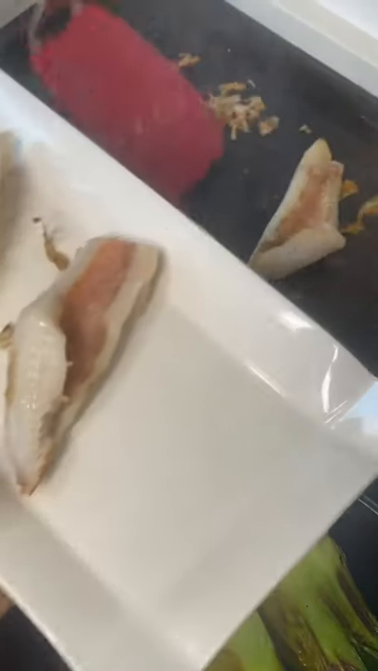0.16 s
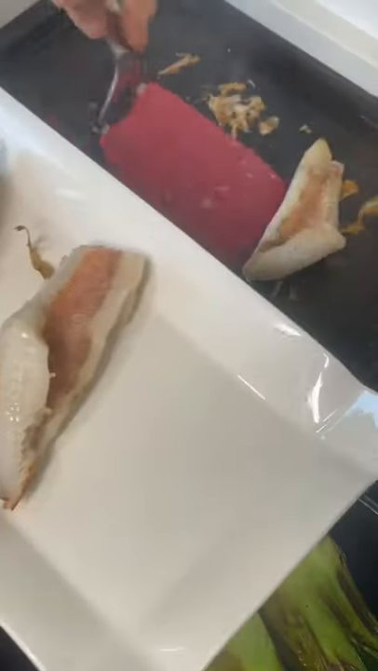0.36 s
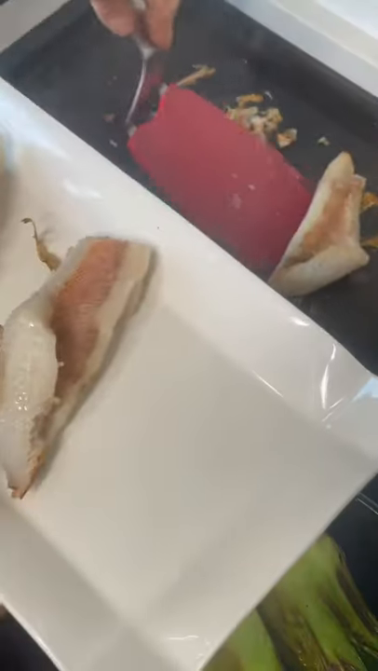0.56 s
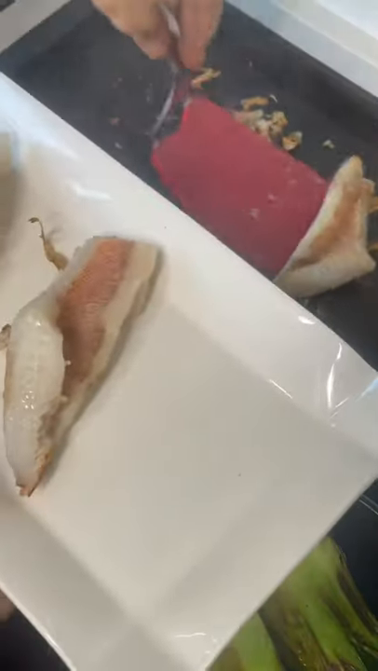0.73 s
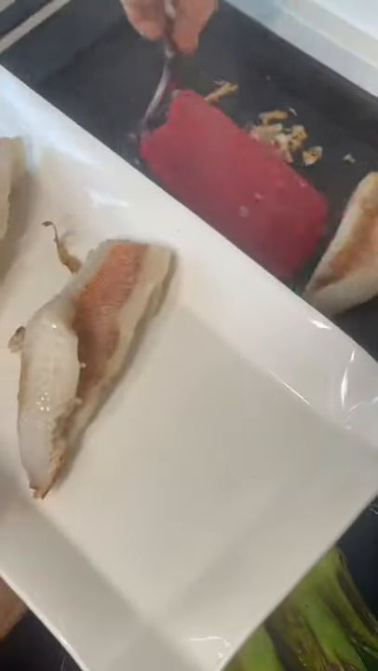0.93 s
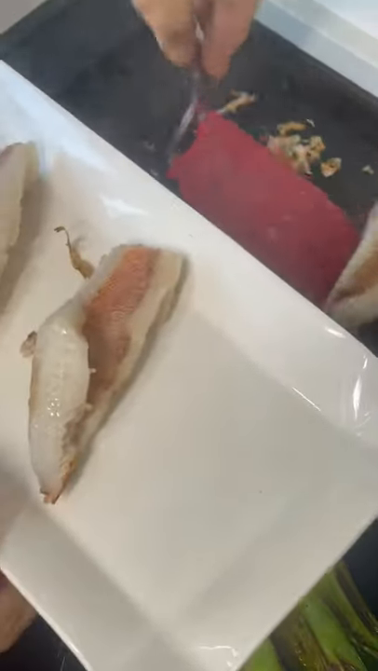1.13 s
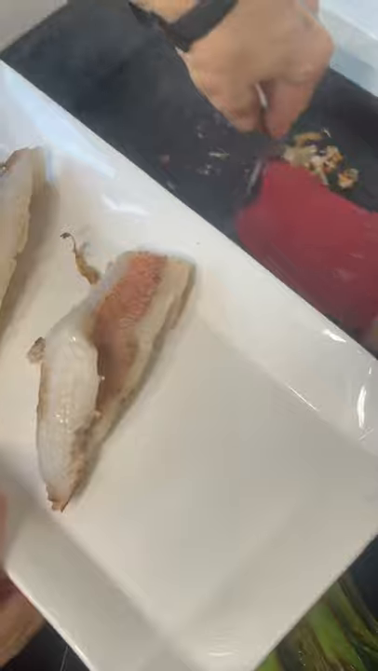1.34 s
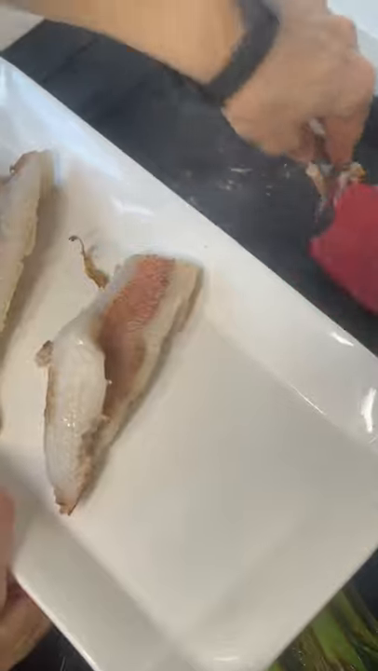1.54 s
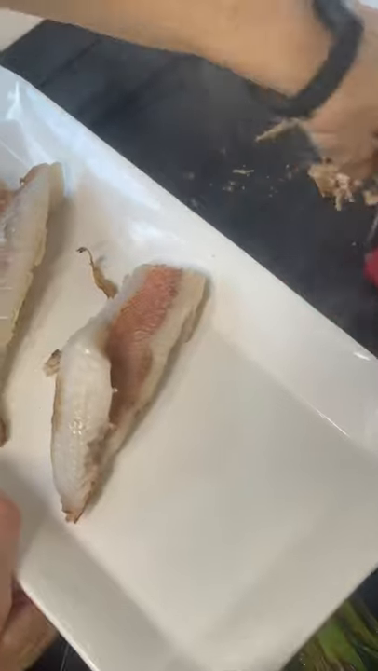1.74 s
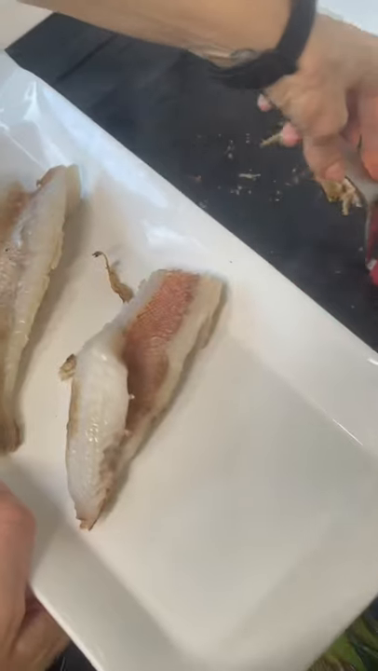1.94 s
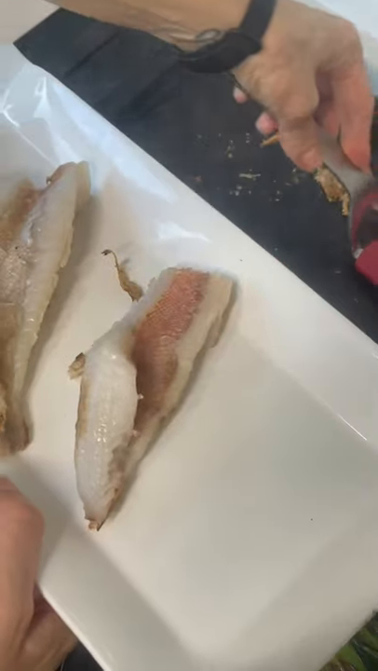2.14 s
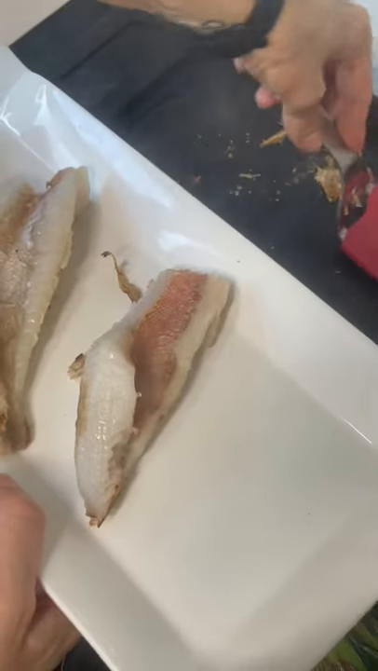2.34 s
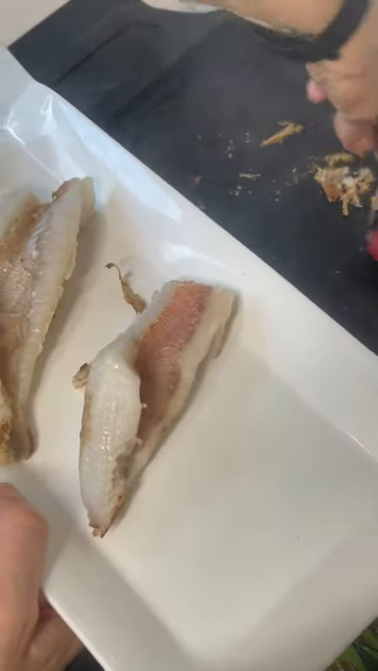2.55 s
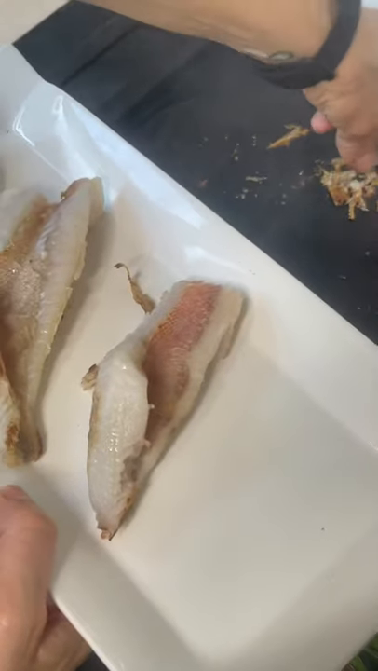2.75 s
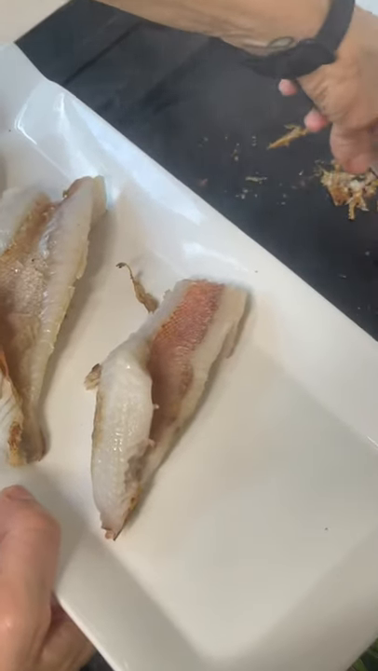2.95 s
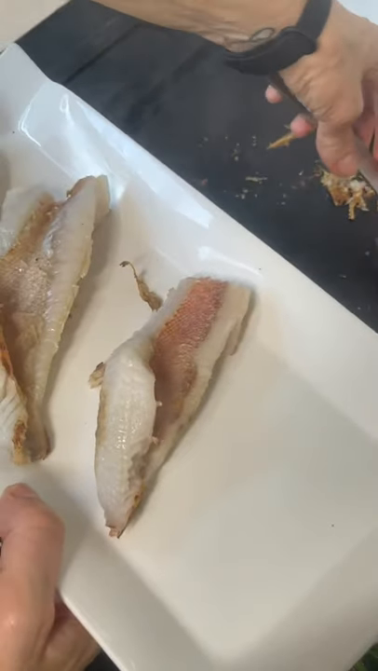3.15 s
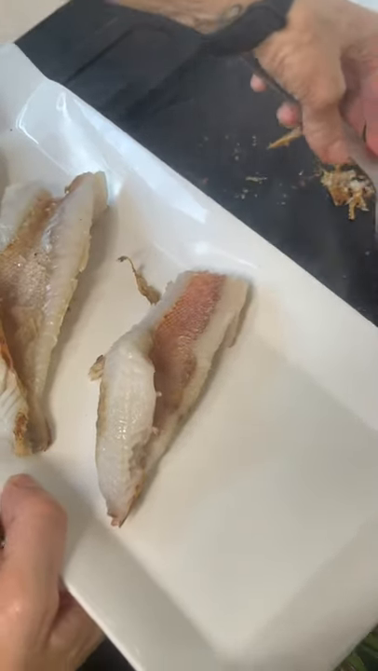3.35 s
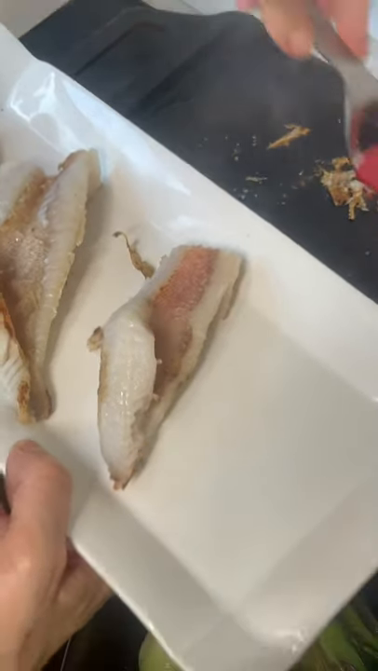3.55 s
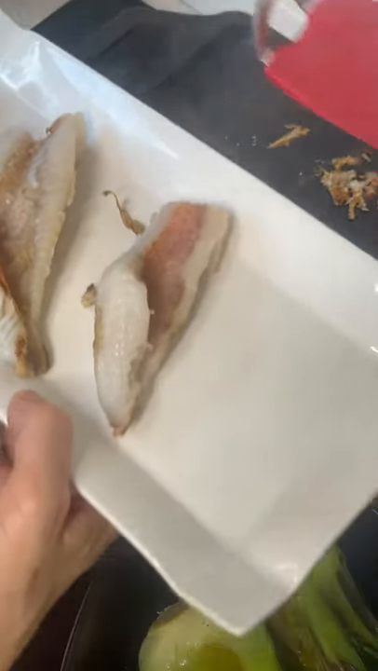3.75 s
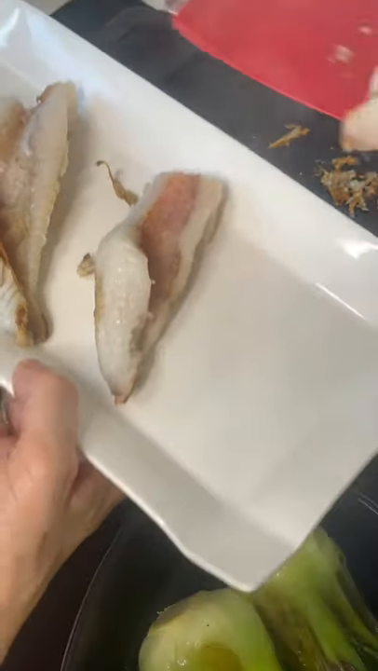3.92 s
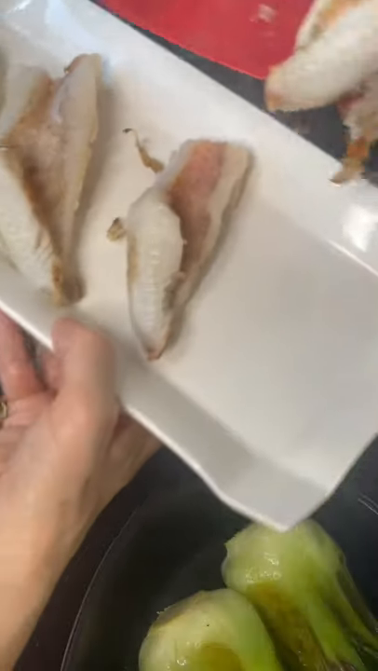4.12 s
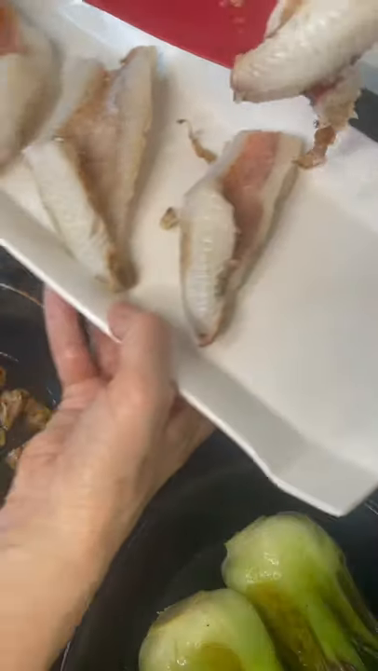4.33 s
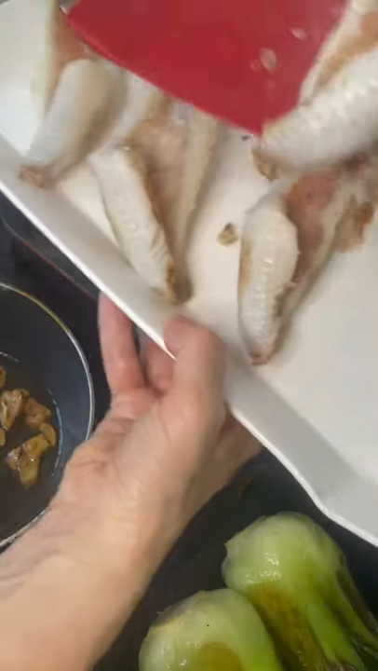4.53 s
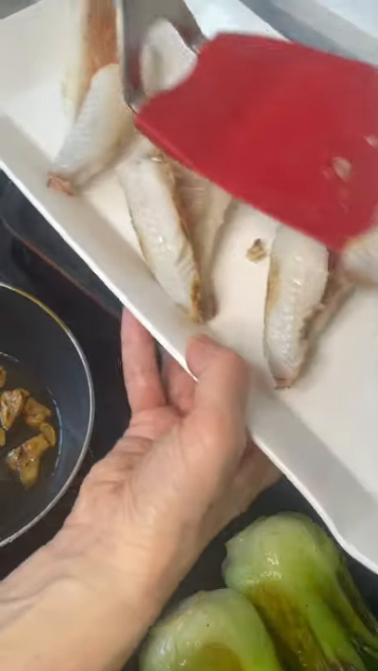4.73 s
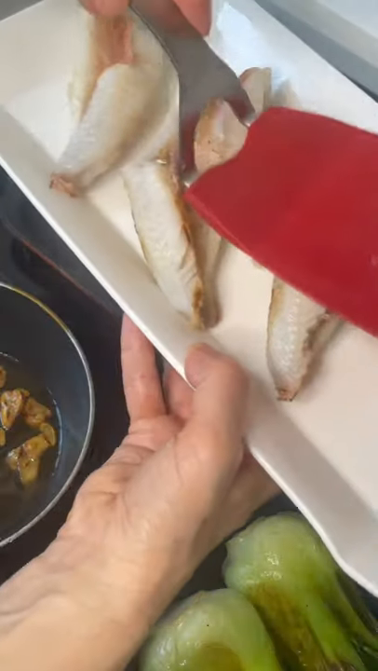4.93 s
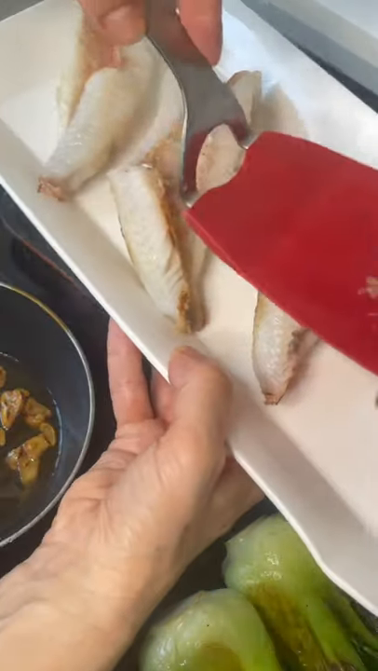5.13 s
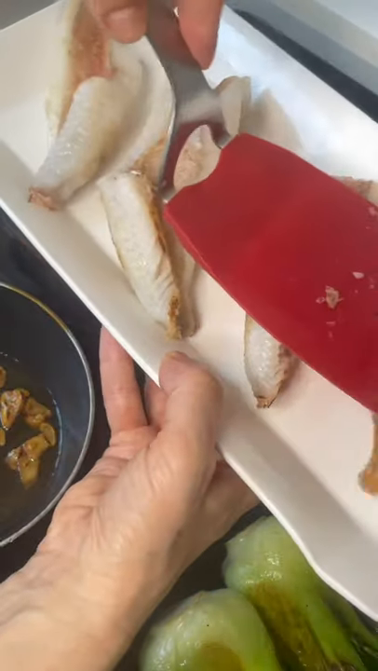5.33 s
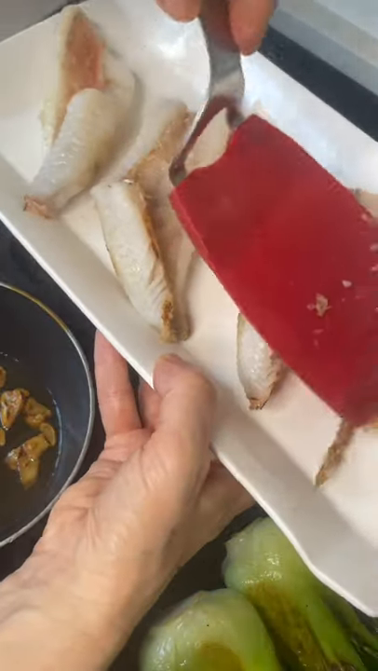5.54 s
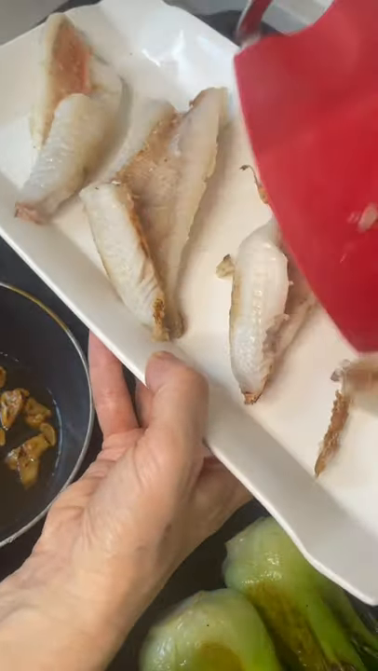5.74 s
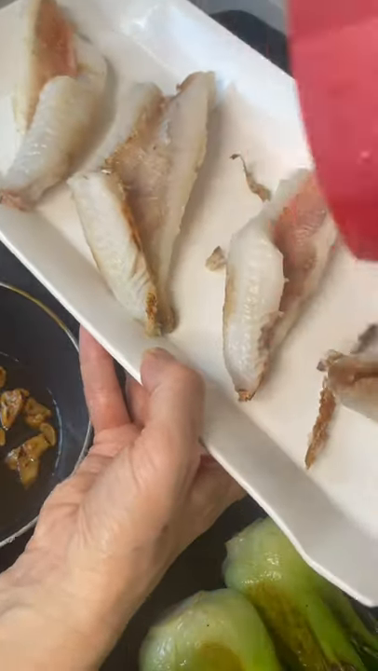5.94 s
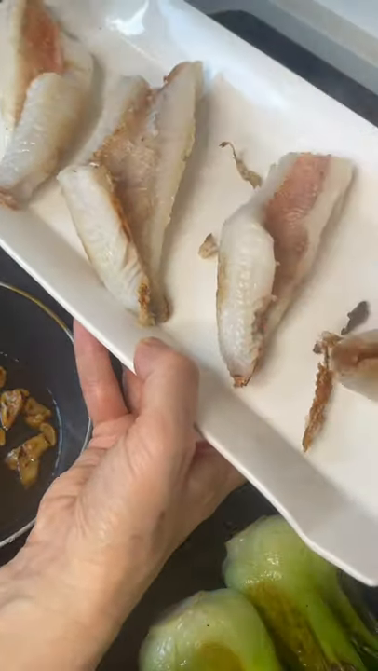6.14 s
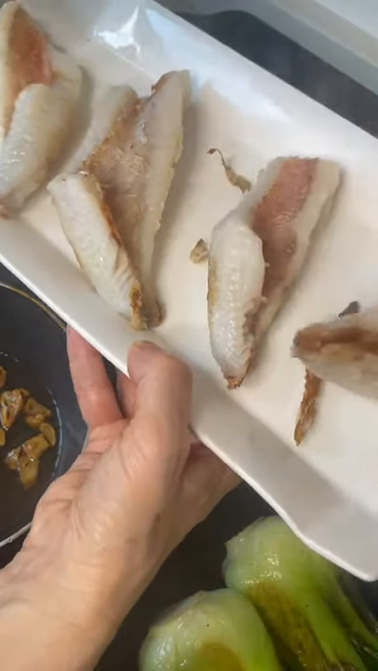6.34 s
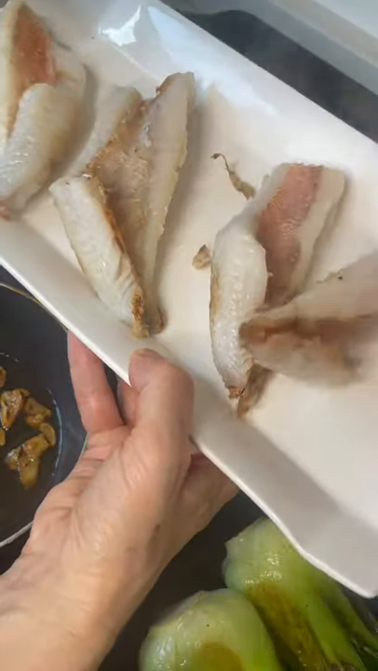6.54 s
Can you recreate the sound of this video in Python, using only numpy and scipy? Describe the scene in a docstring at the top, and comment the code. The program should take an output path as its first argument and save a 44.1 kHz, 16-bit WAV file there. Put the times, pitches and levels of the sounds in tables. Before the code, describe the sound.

Fish fillets sizzle fiercely on a hot steel griddle as a soft spatula knocks and pushes, then the frying thins to sharp crackling oil spits.

```python
"""In a kitchen, fish fries in oil on a steel griddle: dense noise bursts sizzle, swell as a soft spatula
pushes the fillets, then thin to single spits of oil, each a noisy crack with ringing resonances.
Decaying modes sound the spatula's knocks on the griddle and its taps on a plate; resonant noise is its rub.
Dull low thuds fall in pitch, and an extractor blows filtered noise under wavering hums.
The left and right channels differ in likeness, level and phase, the phase drifting far apart in the treble."""
import sys
import numpy as np
from scipy import signal
from scipy.fft import rfft, irfft, next_fast_len
from scipy.io import wavfile
from scipy.ndimage import uniform_filter1d, map_coordinates

SR = 44100
rng = np.random.default_rng(int(sys.argv[2]) if len(sys.argv) > 2 else 0)


def dump(signal):
    """Clip the signal to [-1, 1] and save it as 16-bit WAV at the path in sys.argv[1]."""
    limited = np.clip(np.atleast_2d(signal).T, -1, 1)
    pcm = np.round(limited * 32767).astype(np.int16)
    wavfile.write(sys.argv[1], SR, pcm)


N = 290170  # samples

# Steady frying. Each row: time in seconds, fine fizz level in dB, then the levels of the middle and of the
# large bubbles in dB relative to the fizz.
STEADY_FRYING = [(0.0, -48.5, -8, -25), (0.2, -53, -6, -20), (0.6, -41, -9, -22), (1.1, -38.5, -9, -14.5),
                 (1.55, -31.5, -12, -7), (2.15, -43.5, -8, -15), (2.5, -42, -16, -11.5),
                 (2.95, -40, -3.5, -12.5), (3.1, -46.5, -5.5, -13.5), (3.44, -47, -9.5, -17),
                 (3.85, -55, -8.5, -23), (4.11, -49, -15, -32), (4.3, -55, -5, -24),
                 (4.61, -59.5, -13, -44), (4.98, -56, -10, -18), (5.25, -55, -13, -38),
                 (5.4, -55.5, -9.5, -34), (6.2, -57.5, -13, -32)]


def frying():
    """Steam bursting through oil: noise modulated by dense impulses, in three bubble-size bands."""
    # Spectra of fine fizz, middle and large bubbles. Each row: frequency in Hz, relative level in dB per Hz.
    fizz_spectrum = [(4000, -41), (6000, -11.5), (8500, -3), (10500, 6), (11500, 1), (12600, -12),
                     (13900, -33), (15100, -17.5), (16300, -73)]
    middle_spectrum = [(2000, -25), (3200, -2.5), (4500, -1.5), (6000, 1), (8000, 2), (11000, -14)]
    large_spectrum = [(500, -3), (900, -8.5), (1500, 1), (2500, 0.5), (4000, -1.5), (7000, -10)]
    # Griddle modes the frying keeps alive. Each row: frequency in Hz, bandwidth in Hz, level in dB re large bubbles.
    driven_modes = [(2324, 8.7, -11), (2746, 93, -7)]
    crackle = 1.5 + 0.5 * bursts(per_s=700, spread_db=2.5, t60=0.005)
    fizz = coloured(patchy(crackle * rng.standard_normal(N), 1.64), fizz_spectrum)
    middle = coloured(patchy(crackle * rng.standard_normal(N), 2.15), middle_spectrum)
    middle = middle + 0.3 * blips(500, 4605, turns=13)
    large = coloured(patchy(crackle * rng.standard_normal(N), 2.45), large_spectrum)
    large = large + 0.28 * blips(400, 2610, turns=12)
    steel = sum(amp(db) * narrow(hz, width) for hz, width, db in driven_modes)
    layers = np.sqrt(frying_power()) * [fizz, middle, large + steel]
    return amp(0.69 * wobble(24.86)) * np.sum(layers, axis=0)


def frying_power():
    """Incoherent sources add in power: steady frying plus a flare for each push onto hot steel."""
    # A push wets hot steel. Each row: peak time in seconds, fizz level in dB, rise in seconds (at least 0.005
    # is used), hold in seconds, initial fade in dB per second, middle and large bubble levels in dB re fizz.
    pushes = [(0.28, -37, 0.12, .01, 130, -15, -19.5), (0.346, -28.5, 0.026, 0.07, 77, -10, -22),
              (0.46, -38.5, 0.048, 0.012, 106, -10, -4.5), (0.672, -32.5, .02, 0.047, 29, -8, -12),
              (0.849, -26, 0.013, 0.0034, 530, -2.5, -11), (1.0, -26.5, 0.068, .01, 160, -10.5, -12),
              (1.13, -34.5, 0.06, 0.033, 26, -12, -22.5), (1.279, -24.5, 0.04, 0.036, 133, -7.5, -16),
              (1.539, -25, 0.3, 0.0049, 60, -2.5, -19.5), (1.799, -31, 0.27, 0.011, 62, -4, -17.5),
              (2.239, -32, 0.065, .005, 160, -7, -13.5), (2.364, -35.5, 0.067, 0.036, 31, -1.5, -16.5),
              (2.68, -34.5, 0.11, 0.016, 88, -1.5, -16), (2.83, -41, 0.028, 0.0041, 80, 3, -27)]
    rise_db, spent_db = 18.5, 12.5  # climb over one rise time; drop beyond which the slope is 11 times steeper
    fizz_db, middle_db, large_db = curves(STEADY_FRYING)
    power = amp(2 * np.array([fizz_db, fizz_db + middle_db, fizz_db + large_db]))
    t = np.arange(N) / SR
    for s, db, rise, hold, fade, middle_db, large_db in pushes:
        before = rise_db * np.clip((s - t) / max(rise, 0.005), 0, None)
        down = before + fade * np.clip(t - s - hold, 0, None)
        down = down + 10 * np.clip(down - spent_db, 0, None)
        power = power + amp(2 * (db + np.array([[0], [middle_db], [large_db]]) - down))
    return power


def spits():
    """Each drop of water explodes: an impulsive noise crack excites bubble and drop resonances."""
    # Each row: start in seconds, crack level in dB, body level in dB (offset per part below), drop size 0-1.
    drops = [(0.844, -14.5, -35, .3), (0.952, -23, -41, 0.34), (0.9843, -21, -32, 0.44),
             (1.2277, -27, -39.5, .6), (1.2712, -17, -35, 0.6), (1.3967, -24, -40, 0.7),
             (1.7105, -20.5, -35.5, 0.6), (1.9424, -29, -43, 0.56), (2.0734, -29, -50, 0.17),
             (2.2035, -27, -40.5, 0.8), (2.2303, -30, -42, .1), (2.3802, -26, -52, .01),
             (2.4212, -23, -38.5, 0.7), (2.6802, -20.5, -45, 0.3), (2.757, -26, -51, 0.2),
             (2.7755, -20, -33.5, 0.18), (2.8074, -35, -56, 0.9), (2.8256, -20, -45, 0.13),
             (2.893, -38, -44, 0.7), (2.9985, -20, -37, 0.19), (3.0516, -33, -53, .1),
             (3.067, -27.5, -56, 0.12), (3.1265, -27, -49, 0.27), (3.1929, -30.5, -46, 0.5),
             (3.2625, -21.5, -54, 0), (3.2783, -23, -41, 0.27), (3.3055, -18, -51, 0.14),
             (3.3225, -24, -52, 0), (3.3468, -23.5, -44, 0.17), (3.379, -24.5, -50, 0.07),
             (3.385, -17, -33, 0.28), (3.4179, -34, -58, 0), (3.4723, -30.5, -50, 0.18),
             (3.5131, -25, -60, 0.16), (3.5403, -25.5, -49, 0.22), (3.572, -31, -56, 0.3),
             (3.6174, -31, -59, 0.14), (3.6386, -20.5, -46, 0.43), (3.667, -31, -52, .1),
             (3.715, -34, -51, 0), (3.742, -27, -42.5, 0.15), (3.819, -26, -68, 0.13),
             (3.8911, -21, -51, 0.13), (3.924, -33, -57, 0.1), (4.011, -32, -49.5, .3),
             (4.0635, -23.5, -49, 0.24), (4.0868, -22, -61, 0.17), (4.1436, -30, -72, 0.22),
             (4.2157, -26.5, -51, 0.08), (4.231, -24, -67, 0.38), (4.303, -32.5, -49.5, 0.36),
             (4.3708, -25.5, -45.5, 0.04), (4.44, -30, -52.5, 0.42), (4.5647, -46, -50, 0.12),
             (4.6203, -31, -51, 0.13), (4.7452, -36, -70, 0.1), (4.7637, -41, -62, .1),
             (4.7757, -28.5, -52, 0.22), (4.8502, -21.5, -38.5, 0.82), (4.88, -20, -32, 0.38),
             (4.915, -17.5, -30, 0.4), (5.0315, -31, -65, 0.3), (5.0796, -32, -51, 0.05),
             (5.0928, -36, -59, 0.15), (5.1123, -30, -68, 0.3), (5.163, -34.5, -71, 0.5),
             (5.2451, -13.5, -32, 0.5), (5.367, -32, -57, 0.2), (5.4642, -33, -50, .2),
             (5.6264, -25, -53, 0), (5.6508, -39, -50, 0.03), (5.6986, -15, -41, 0.34),
             (5.768, -29.5, -44, 0.35), (5.963, -37.5, -67, 0.15), (6.0754, -35, -49, 0.15),
             (6.1356, -33.5, -61, 0.1), (6.306, -44.5, -52, 0.16), (6.4584, -35.5, -56, 0.8),
             (6.5423, -24, -43.5, 0.27)]
    # Spectra of crack and low body. Each row: frequency in Hz, relative level in dB per Hz.
    crack_spectrum = [(2000, -18), (4000, -12), (7000, 2), (9000, 7), (12000, 5.5), (13500, -87),
                      (16000, -43)]
    body_spectrum = [(500, -13), (1200, -6.5), (2200, -3), (3500, -5), (5500, -3), (8000, -15.5)]
    centre_hz, pitch_spread = np.array([9700, 3360]), 0.16  # steam bubble and drop; log scatter
    snap_db, snap_hz = -7.5, 7000  # re the crack level for the smallest drop
    crack_gain, body_gain, bubbles = np.zeros((3, N + SR))
    t = np.arange(SR // 4) / SR
    for s, db, body_db, size in drops + small_spits():
        hz, body_hz = centre_hz * np.exp(pitch_spread * np.clip(rng.standard_normal(2), -2, 2))
        size = np.clip(size, 0, 1)  # bigger drops burst more slowly and last longer
        fall = amp(-60 * t / (0.0085 + 0.093 * size)) + 0.16 * amp(-60 * t / 0.093)
        shape = fall * (1 - np.exp(-t / (0.0001 + 0.0069 * size ** 2)))
        # The first snap dies within about one cycle
        snap = amp(db + snap_db - 8.8 * size) * np.sin(2 * np.pi * snap_hz * t) * np.exp(-1.2 * snap_hz * t)
        rings = amp(db - 14) * resonant(hz, 13.3, len(t))
        rings = rings + amp(body_db + 1.5) * resonant(body_hz, 4.2, len(t))
        at = round(s * SR)
        crack_gain[at:][:len(t)] += shape * amp(db - 5)
        body_gain[at:][:len(t)] += shape * amp(body_db - 1.5)
        bubbles[at:][:len(t)] += shape * rings + snap
    crack = crack_gain[:N] * coloured(rng.standard_normal(N), crack_spectrum)
    body = body_gain[:N] * coloured(rng.standard_normal(N), body_spectrum)
    return amp(1.5 * wobble(350)) * (crack + bubbles[:N] + body)  # uneven sputter


def small_spits():
    """Lesser spits at uniformly random times, their levels following the steady fizz."""
    per_s, crack_db, body_db = 14, 10.5, -18.5  # crack re fizz, body re crack
    when, luck, size = rng.random((int(per_s * N / SR), 3)).T
    db = curves(STEADY_FRYING)[0][(when * N).astype(int)] + crack_db + 8 * (luck - 0.5)
    return list(zip(when * N / SR, db, db + body_db, 0.21 * size))


def spatula():
    """Modal response: soft blows ring griddle, rim and blade; sliding friction drives the low modes."""
    # Each row: start in seconds, boom, rim and clack levels in dB (offset per mode set below).
    knocks = [(0.213, -51, -47, -39.5), (0.445, -26, -35, -23.5), (0.682, -42.5, -47, -48),
              (0.75, -49, -59, -28), (0.814, -43, -59, -48), (0.844, -60, -34, -23.5),
              (0.985, -31.5, -36, -20.5), (1.009, -31, -35, -27), (1.257, -35, -42.5, -28),
              (1.375, -34.5, -41, -54), (1.457, -51, -43, -26.5), (1.711, -42, -28.5, -30.5),
              (1.757, -38, -53, -55), (1.868, -38, -51, -48), (1.907, -41.5, -44, -55),
              (2.432, -46.5, -47, -43.5), (2.634, -48.5, -33.5, -37), (2.712, -63, -54, -46),
              (2.833, -53, -73, -59)]
    # Lowest bending pair (it beats), next bending modes, rim modes and blade modes.
    # Each row: frequency in Hz, relative level in dB, 60 dB decay time in seconds.
    lowest_pair = [(103.8, 4, 0.19), (114.2, 1.5, 0.5)]
    next_modes = [(201, 2.5, 0.13), (248, -6, 0.13)]
    rim_modes = [(313.5, 6, 0.045), (394, 0.5, 0.1), (497.5, 2.5, 0.11), (673, -0.5, 0.05)]
    blade_modes = [(925, 0.5, 0.023), (1157, -1, 0.041), (1442, -1, 0.069), (1770, 0, 0.047)]
    # Strokes over the steel. Each row: loudest time in seconds, rumble level in dB before the 12 dB cut below.
    strokes = [(0.49, -27.5), (0.8, -32), (1.3, -32.5), (2.79, -45)]
    rise, fall = 117, 150  # dB per second
    out, t = np.zeros(N + SR), np.arange(SR // 2) / SR
    for s, boom_db, rim_db, clack_db in knocks:
        low = amp(boom_db - 3) * ring(lowest_pair, t, 0.0034)
        low = low + amp(boom_db - 1.0) * ring(next_modes, t, 0.0017)
        high = amp(rim_db - 3.5) * ring(rim_modes, t, 0.0012)
        high = high + amp(clack_db - 10.5) * ring(blade_modes, t, 0.0014)
        out[round(s * SR):][:len(t)] += low + high
    t = np.arange(N) / SR
    drag = sum(amp(db - np.maximum(rise * (s - t), fall * (t - s))) for s, db in strokes)
    murmur = sum(amp(db) * narrow(hz, 39) for hz, db, _ in lowest_pair + next_modes)
    return out[:N] + amp(-12.0) * drag * unit(murmur)


def plate():
    """Light taps excite decaying china modes; one wet rub is friction noise through resonances."""
    # Each row: frequency in Hz, relative level in dB, 60 dB decay time in seconds.
    china_modes = [(2060, -2, 0.05), (2600, -9, 0.15), (3040, 2, 0.081), (3950, -4, .04), (4840, -7, .06)]
    # Each row: start in seconds, level in dB.
    taps = [(5.25, -59), (5.705, -51), (5.762, -52), (5.945, -50)]
    # The rub: start in seconds, nominal length in seconds (the fade ends at 1.2 times it), level in dB.
    wet_rub = (5.567, .05, -49)
    # Each row: frequency in Hz, bandwidth in Hz, relative level in dB.
    rub_resonances = [(1340, 150, -3), (2590, 120, -28), (3680, 210, 4), (4900, 280, -1)]
    out, t = np.zeros(N + SR), np.arange(SR // 4) / SR
    for s, db in taps:
        out[round(s * SR):][:len(t)] += amp(db) * ring(china_modes, t, 0.0008)
    s, length, db = wet_rub
    u = (np.arange(N) / SR - s) / length
    stroke = np.clip(u * 12, 0, 1) * np.clip((1.2 - u) * 0.65, 0, 1)
    squeak = unit(sum(amp(g) * narrow(hz, width) for hz, width, g in rub_resonances))
    return out[:N] + amp(db) * stroke * squeak


def thuds():
    """Dull thuds: strongly damped oscillations of a few cycles, falling in pitch."""
    # Each row: start in seconds, level in dB before the 6.5 dB lift below, nominal pitch in Hz (it glides from
    # 1.85 to 0.76 times this), rise to the envelope's peak in seconds (at least 0.004 is used).
    low_thuds = [(3.626, -38, 69, 0.018), (3.733, -27.5, 79, 0.018), (3.789, -36, 75, 0.013),
                 (3.84, -33.5, 88, 0.013), (3.882, -33, 87, 0.018), (3.942, -35, 75.4, 0.014),
                 (4.003, -38, 74, 0.015), (4.065, -37.5, 73.6, 0.015), (4.108, -47, 67, 0.0088)]
    out, t = np.zeros(N + SR), np.arange(SR // 8) / SR
    for s, db, hz, rise in low_thuds:
        u = 2 * t / max(rise, 0.004)
        cycles = hz * (0.763 * t + 0.012 * (1 - np.exp(-t / 0.011)))
        tone = np.sin(2 * np.pi * cycles) + 0.068 * resonant(190, 9.6, len(t))
        out[round(s * SR):][:len(t)] += amp(db + 6.5) * u ** 2 * np.exp(-u) * tone
    return out[:N]


def extractor():
    """Turbulent airflow as broadband noise, with a few tones of wavering phase and strength."""
    # Each row: frequency in Hz, relative level in dB per Hz.
    airflow_spectrum = [(25, -48), (40, 4.5), (60, -1), (120, -4), (230, -10), (300, -5), (430, -15.5),
                        (640, -17), (800, -26.5), (1000, -25.5), (2000, -24), (4000, -37), (7000, -76)]
    # Each row: frequency in Hz, level in dB.
    steady_hums = [(43.1, -65), (301.5, -68.5)]
    # A hum that switches on: start in seconds, frequency in Hz, level in dB.
    late_hum = (5.55, 101, -61.5)
    air_db, gusts_db = -59.5, 1.2 * wobble(6)
    air = amp(air_db + gusts_db) * coloured(rng.standard_normal(N), airflow_spectrum)
    s, hz, db = late_hum
    late = amp(db) * hum(hz, 2.5) * np.clip((np.arange(N) / SR - s) / 0.14, 0, 1)
    return air + late + sum(amp(db) * hum(hz, 2.4) for hz, db in steady_hums)


def kitchen(x):
    """Reverberation as convolution with noise whose decay time depends on frequency."""
    # Each row: frequency in Hz, 60 dB decay time in seconds.
    decay_times = [(200, 0.31), (2000, 0.24), (10000, 0.24)]
    hz, t, z = signal.stft(rng.standard_normal(SR // 2), SR, nperseg=256)
    decay = amp(-60 * t / along(decay_times, hz)[:, None])
    tail = signal.istft(z * decay, SR, nperseg=256)[1]
    return signal.fftconvolve(np.pad(x, (300, 0)), tail / np.linalg.norm(tail))[:N]


def ring(modes, t, attack):
    """One blow as a sum of damped sines of random strength, neighbours in opposite polarity."""
    tones = 0
    for k, (hz, db, t60) in enumerate(modes):
        gain = (-1) ** k * amp(db + rng.normal(0, 1.5) - 60 * t / t60)
        tones = tones + gain * np.sin(2 * np.pi * hz * t)
    return tones * (1 - np.exp(-t / attack))


def bursts(per_s, spread_db, t60):
    """Shot noise: tiny steam bursts at random times and sizes, each decaying exponentially; rms 1."""
    starts = (rng.random(N) < per_s / SR) * amp(spread_db * rng.exponential(1, N))
    return unit(signal.lfilter([1], [1, -amp(-60 / (t60 * SR))], starts))


def blips(per_s, hz, turns):
    """Bubble resonance: short decaying rings at scattered pitches, rising as each bubble shrinks; rms 1."""
    count = int(per_s * N / SR)
    when, pitch, size = rng.random(count), rng.standard_normal(count), rng.standard_normal(count)
    k = np.arange(256)
    f = hz * np.exp(0.3 * pitch[:, None]) / SR  # cycles per sample
    tones = np.sin(2 * np.pi * f * k * (1 + 0.004 * k * f))
    rings = amp(3 * size[:, None]) * np.exp(-k * f / turns) * tones
    at = (when[:, None] * N).astype(int) + k
    return unit(np.bincount(at.ravel(), rings.ravel(), N + len(k))[:N])


def patchy(x, depth_db):
    """Random modulation: patches of differing gain in time and frequency."""
    z = signal.stft(x, nperseg=256)[2]
    field = uniform_filter1d(rng.standard_normal(z.shape), 10, 0)
    field = uniform_filter1d(field, 8, 1)
    return signal.istft(z * amp(depth_db * unit(field)), nperseg=256)[1][:N]


def hum(hz, waver_db):
    """Phase and amplitude modulation: a tone of rms near 1 that wavers in pitch and strength."""
    phase = 2 * np.pi * hz * np.arange(N) / SR + 0.79 * wobble(6.3)
    return np.sqrt(2) * np.sin(phase) * amp(waver_db * wobble(7.4))


def resonant(hz, sharpness, count):
    """Resonance: a short noise through one peak of the given quality factor, rms 1."""
    return unit(signal.lfilter(*signal.iirpeak(hz, sharpness, SR), rng.standard_normal(count)))


def narrow(hz, width_hz):
    """Steadily driven resonator: noise through one second-order band-pass, rms 1."""
    def response(f):
        return 1j * f * width_hz / (hz * hz - f * f + 1j * f * width_hz)
    return unit(filtered(rng.standard_normal(N), response))


def coloured(x, spectrum):
    """Spectral shaping: x weighted by (Hz, dB) points, rms 1."""
    return unit(filtered(x, lambda hz: amp(along(spectrum, hz))))


def filtered(x, response):
    """Linear filtering: the spectrum of x times a complex response of frequency."""
    m = next_fast_len(N + SR // 2)
    return irfft(rfft(x, m) * response(np.fft.rfftfreq(m, 1 / SR)), m)[..., :N]


def wobble(rate):
    """Slow random modulation: a smooth curve through rate random knots a second."""
    knots = rng.standard_normal(int(N * rate / SR) + 4)
    return map_coordinates(knots, [np.arange(N) * rate / SR])


def curves(rows):
    """Linear interpolation in time: one value per sample for each column after the time."""
    s, *cols = np.transpose(rows)
    return [np.interp(np.arange(N) / SR, s, c) for c in cols]


def along(points, hz):
    """Interpolation of (Hz, value) points on a logarithmic frequency axis."""
    f, v = np.transpose(points)
    return np.interp(np.log(hz + 1), np.log(f + 1), v)


def amp(db):
    """Amplitude ratio of a level in dB."""
    return 10 ** (np.asarray(db) / 20)


def unit(x):
    """Normalization to an rms of 1."""
    return x / np.sqrt(np.mean(x ** 2) + 1e-20)


def scene():
    """Partial coherence: a shared sound plus a scrambled copy of opposite sign in the two channels."""
    # Each row: frequency in Hz, left-right likeness 0-1.
    likeness = [(60, .96), (400, .88), (700, .6), (950, .4), (1300, .85), (2000, .998), (3200, .96),
                (4500, .993), (8600, .99), (9200, .82), (10200, .98), (11500, .85), (12000, .99),
                (12900, .5), (13600, .9), (14500, .4), (15100, .99)]
    near = spits() + spatula() + plate()
    mid = near + amp(-9) * kitchen(near) + frying() + thuds() + extractor()
    scatter = rng.standard_normal(3000) * amp(-np.arange(3000) / 75)
    other = signal.fftconvolve(mid, scatter / np.linalg.norm(scatter))[:N]

    def turn(hz):  # mixing angle in radians: the likeness is the cosine of twice this
        return np.arccos(np.clip(along(likeness, hz), -1, 1)) / 2

    same = filtered(mid, lambda hz: np.cos(turn(hz)))
    apart = filtered(other, lambda hz: np.sin(turn(hz)))
    return np.array([same + apart, same - apart])


def record(dry):
    """Interchannel level and phase differences, split evenly between the channels, and a band limit."""
    # Each row: frequency in Hz, left minus right level in dB.
    level_difference = [(60, 1.5), (160, 2.5), (450, 3.5), (1300, 2.5), (2100, 0)]
    # Each row: frequency in Hz, phase by which left leads in radians.
    phase_lead = [(100, 0), (8850, 0), (9250, -1.5), (10250, -3.14), (11000, -4.4), (11900, -6.28),
                  (13000, -6.6), (13250, -9.42), (14350, -9.6), (14750, -12.3), (15200, -12.57)]
    top_hz = 15900
    half = np.array([[0.5], [-0.5]])  # left, right

    def response(hz):
        gain = amp(half * along(level_difference, hz))
        return gain * np.exp(1j * half * along(phase_lead, hz)) * (hz < top_hz)

    return filtered(dry, response)


dry = scene()
out = record(dry)
dump(out)
```